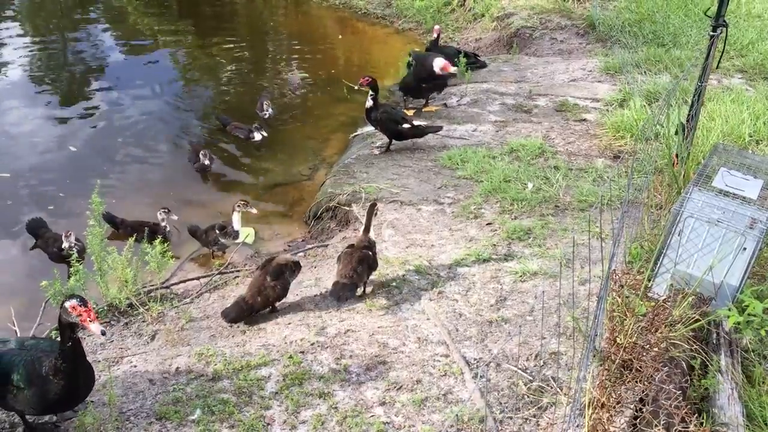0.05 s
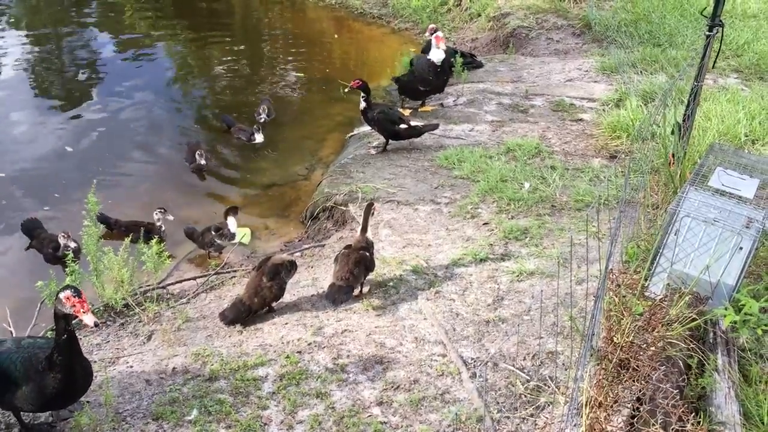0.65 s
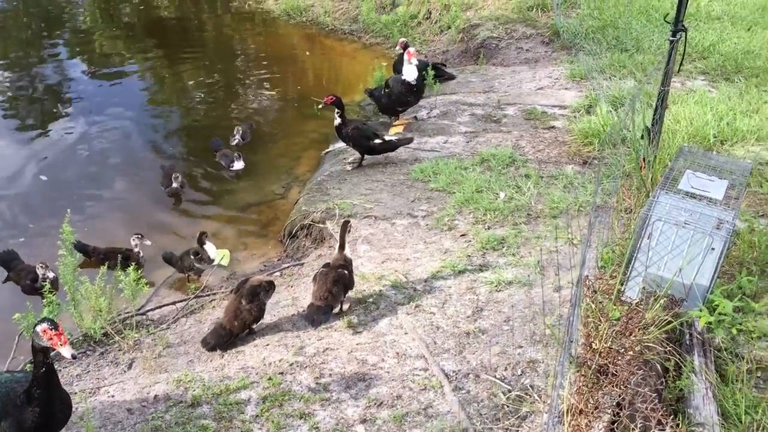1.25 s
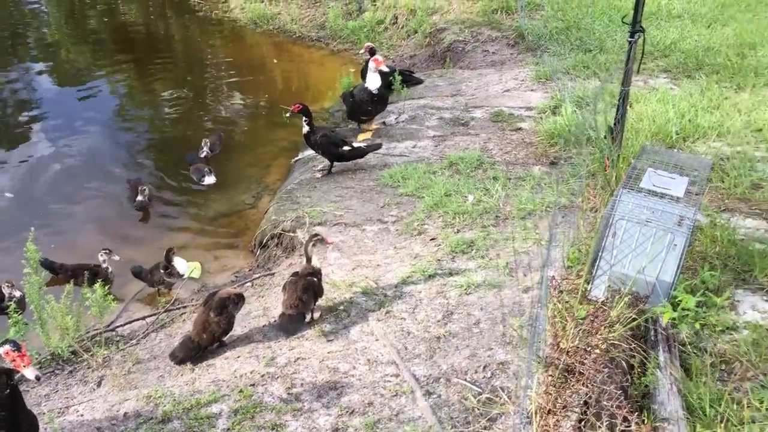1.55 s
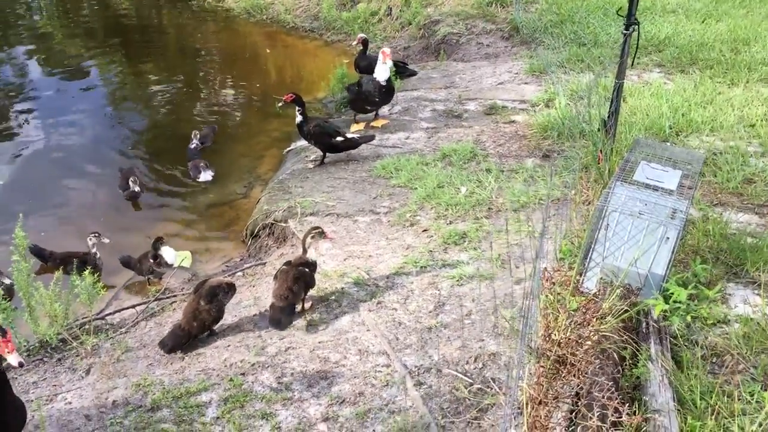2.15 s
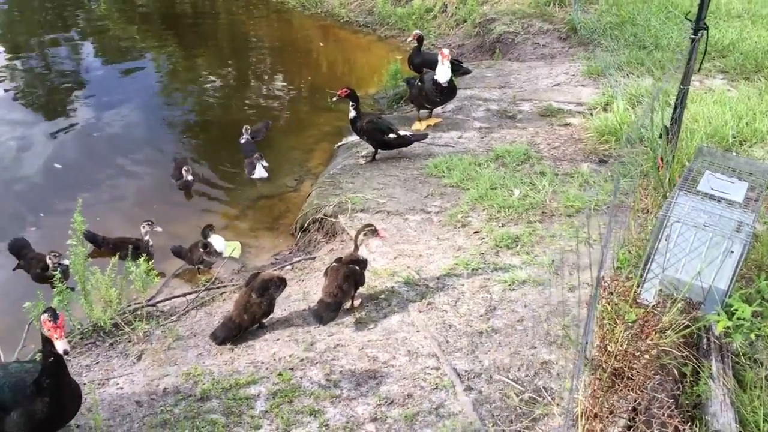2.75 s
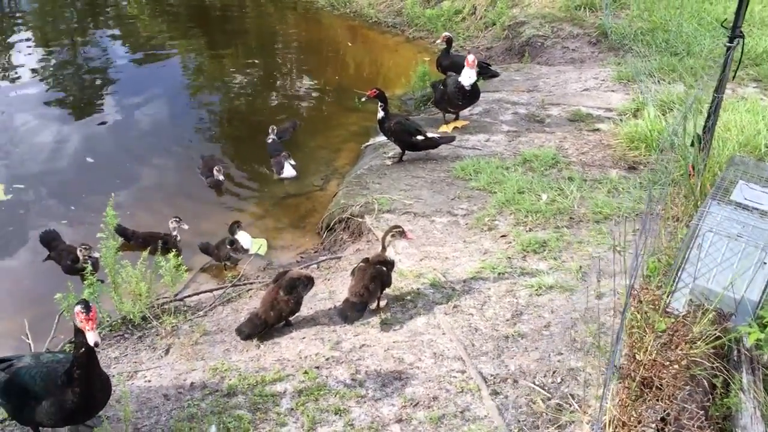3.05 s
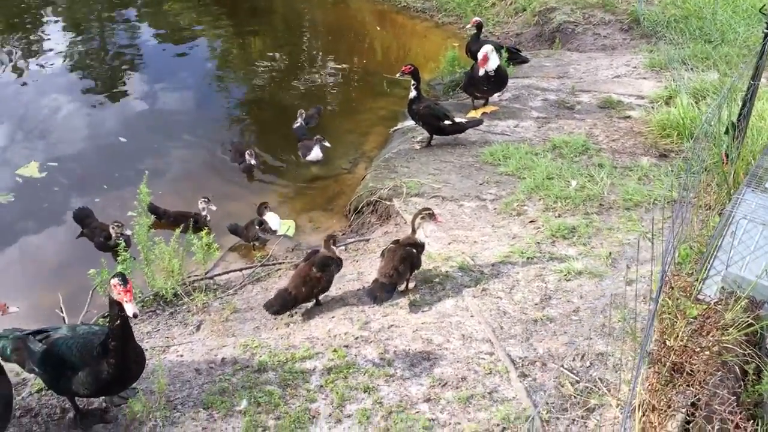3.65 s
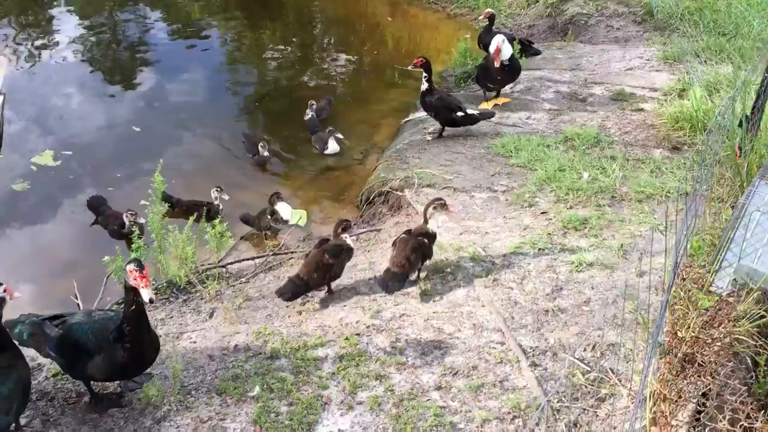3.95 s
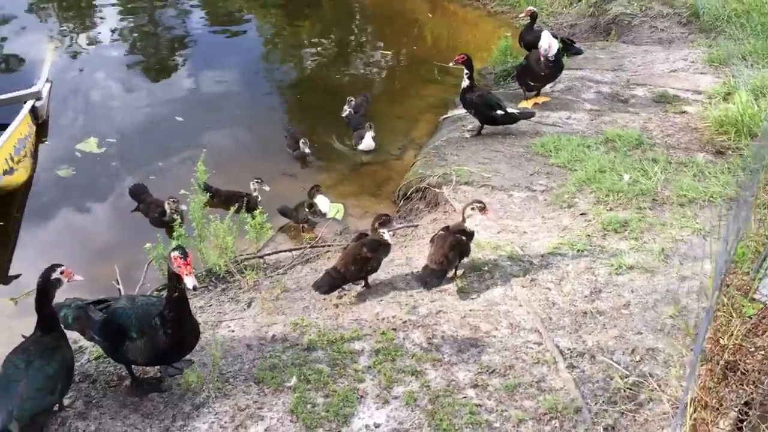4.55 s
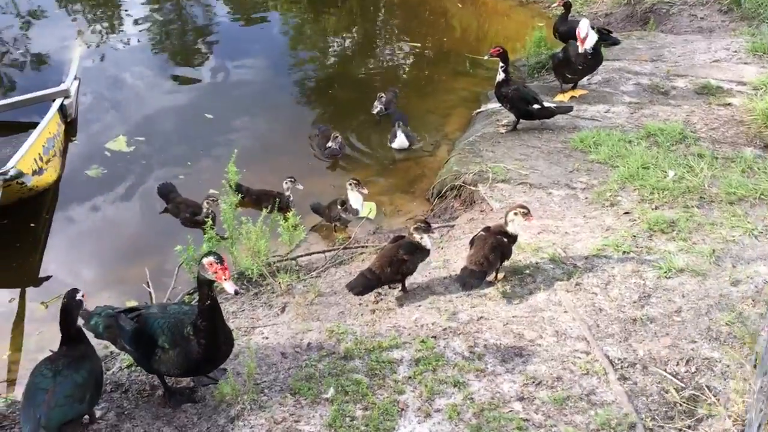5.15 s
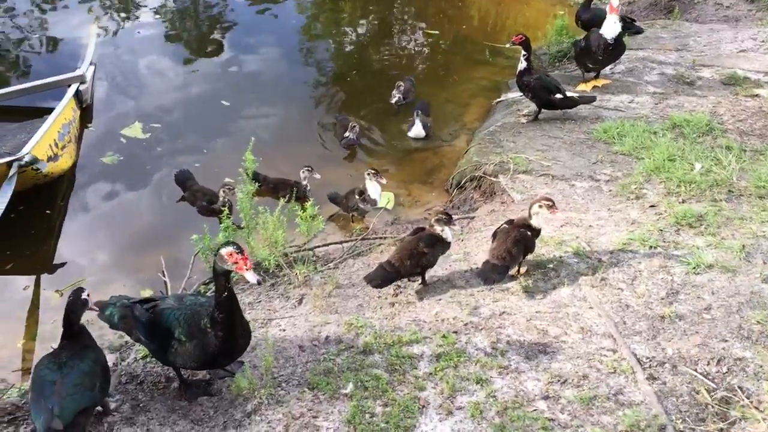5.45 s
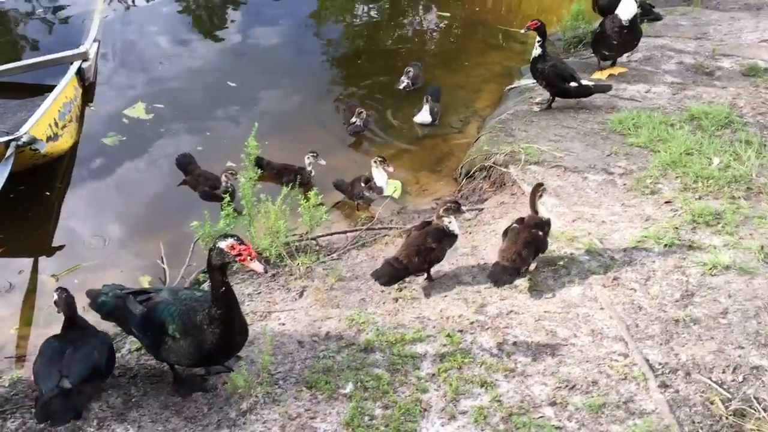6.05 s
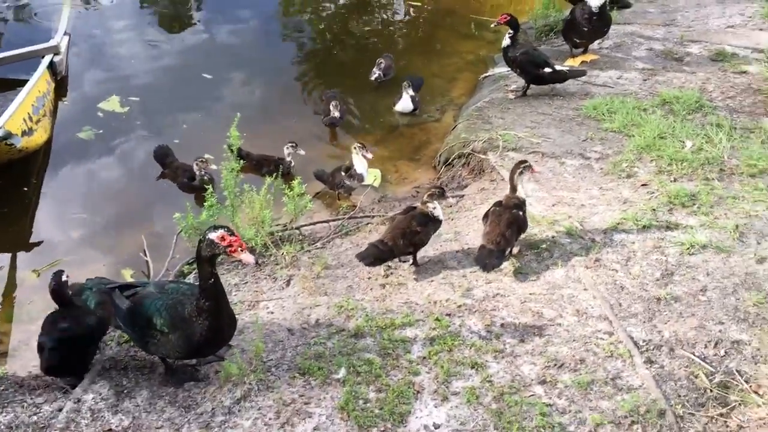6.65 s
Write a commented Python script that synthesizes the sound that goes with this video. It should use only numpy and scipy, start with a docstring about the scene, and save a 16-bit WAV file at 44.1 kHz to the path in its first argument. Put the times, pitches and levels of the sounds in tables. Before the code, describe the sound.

A steady low rumble of outdoor air and distant droning machinery fills the whole seven seconds beside a pond. Over it, ducklings give soft, short, high peeps in little runs: from 0.3 to 0.8 seconds, around 1.5 with a couple of lower squeaks, once at 2.4, and in a clearer pair near 2.9. Fainter peeps follow until 3.7, then more come around 5.3 and 5.9. Soft dull pats on sand and tiny dry twig ticks are scattered throughout, the clearest pat at 6 seconds. Light rustling comes at about 4.6 and 5.9, and more strongly at 6.6, together with a last run of peeps that climbs in pitch. A barely audible insect holds a thin high note for most of the time; another ticks faintly from 5 seconds and swells into a very high, soft buzz from 5.5 to the end.

```python
"""Ducklings at a pond's edge.

Ducklings peep in short runs: each peep is an arch of pitch, its harmonics shaped by throat and bill.
The flock adds lower pips, soft pats, dry ticks and, late on, rustling from sliding friction.
In the grass one insect holds a thin high note; a katydid ticks, then buzzes, with its wings.
Behind them are outdoor air and the drone of distant machinery."""
import sys
import numpy as np
from scipy import signal
from scipy.fft import rfft, irfft, next_fast_len
from scipy.io import wavfile

SR = 44100
rng = np.random.default_rng(int(sys.argv[2]) if len(sys.argv) > 2 else 0)


def transcribe(u):
    """Save the signal u as a 16-bit wav file named by the first command-line argument.

    u: samples, shape (n,) or (channels, n), limited to [-1, 1]; the rate is SR.
    q: integer samples, one column per channel.
    """
    v = np.clip(np.atleast_2d(u).T, -1, 1)
    q = np.round(v * 32767).astype(np.int16)
    wavfile.write(sys.argv[1], SR, q)


N = 299439
TIME_S = np.arange(N) / SR

# engine orders: pitch_hz, level_db, wander_hz
DRONE_ORDERS = [(50.7, -51.5, 0.23), (69.97, -49.5, .2), (81.9, -57.5, 0.32), (126.4, -60, 0.38),
                (182, -68, 1.5), (361.7, -74.5, 3.51)]
# swell of the low orders: time_s, gain_db
DRONE_SWELL = [(0, 0), (1.2, 2), (2.1, -1), (3.15, 2), (4.2, 0), (5.05, -3), (5.52, 3.3), (5.82, -7.5),
               (6.4, -0.7), (6.79, -5)]
# outdoor rumble and air: freq_hz, density_db
AIR_SPECTRUM = [(12, -37), (28, -13.5), (46, -1.5), (66, 1.5), (100, -4.5), (128, -7.5), (165, -14.5),
                (240, -20.5), (470, -27), (620, -27), (760, -30), (1000, -30.5), (1800, -37), (3000, -42.5),
                (8500, -48.5), (14000, -48)]
# breeze on the air's middle band: time_s, gain_db
BREEZE = [(0, 1.8), (.4, -1), (1.0, 0), (3.0, -0.6), (4.75, .5), (5.45, -1), (5.85, 0), (6.35, -0.5),
          (6.79, 2)]
# katydid wing spectrum: freq_hz, density_db
KATYDID_WING = [(7000, -31), (9000, -8.5), (10300, -7), (11600, 0), (12900, -7.5), (13800, -15),
                (16000, -25)]
# thin insect's trills: start_s, end_s, level_db
TRILLS = [(-.3, 2.15, -85.5), (2.2, 4.0, -83), (4.0, 6.3, -86)]
# rustle strokes: peak_s, rise_s, fall_s, level_db, bright_share
RUSTLES = [(4.6, .75, 0.27, -65, 0.92), (4.785, .11, 0.1, -63, 0.53), (5.87, .2, 0.25, -63.5, 0.73),
           (6.572, .085, .19, -55.5, .55), (6.68, .05, 0.03, -58.5, 0.15), (6.775, 0.11, .12, -66.5, .05)]
# dull friction spectrum: freq_hz, density_db
RUSTLE_DULL = [(200, 5), (600, 0), (1400, 9), (2300, 9.5), (4000, 6.5), (7500, -4.5), (16000, -34)]
# bright friction spectrum: freq_hz, density_db
RUSTLE_BRIGHT = [(300, 16), (2500, -7), (5000, 5), (9500, 6), (14500, 5.5), (16000, -7)]
# pats on sand: start_s, relative_peak_db, pitch_ratio
PATS = [(0.332, -41, 0.98), (1.611, -51, 0.91), (2.616, -43.5, 1.0), (3.751, -44, 0.86), (4.896, -41, 0.93),
        (5.847, -43.5, 0.79), (6.023, -36.5, 0.63), (6.44, -47.5, 0.64), (6.53, -43.5, 1.0),
        (6.68, -43, 1.0)]
# damped modes of a pat: freq_hz, gain_db, width_hz
PAT_MODES = [(248, 10, 150), (538, 17, 250), (880, 6, 380)]
# snaps of twigs and grit: start_s, relative_peak_db, tail_db, centre_hz
TWIG_TICKS = [(0.15, -47, -16, 4940), (0.220, -50.5, -16, 2800), (0.333, -57, -10, 9000),
              (1.191, -46, -16.5, 10500), (1.334, -61, -8, 6000), (1.762, -49.5, -22, 4970),
              (2.008, -47, -20, 4270), (2.6165, -51.5, -18, 5500), (2.7114, -58, -14, 5000),
              (4.519, -48.5, -10, 10500), (6.0236, -47, -22, 8000), (6.443, -57, -13, 4500)]
# lower pips and squeaks: top_s, length_s, top_hz, level_db, rise_share
PIPS = [(1.346, .024, 698, -63, .6), (1.373, .015, 1130, -57, 0.83), (2.9, 0.022, 1780, -64.5, 0.4),
        (4.49, 0.011, 2090, -66, 0.47), (4.986, 0.033, 1690, -69, 0.44), (5.06, 0.096, 1515, -72, .45),
        (5.13, .047, 1268, -57, .45), (5.359, .034, 1200, -67, 0.47), (6.13, .075, 1290, -69, 0.46)]
# throat and bill response for pips: freq_hz, gain_db
PIP_THROAT = [(600, 1), (950, 2), (1300, -9.5), (2000, -3), (4000, -1)]
# duckling peeps: top_s, length_s, start_hz, top_hz, level_db, rise_share
PEEPS = [(0.286, 0.042, 2350, 2750, -69.5, .32), (0.387, 0.063, 2330, 3520, -68, 0.26),
         (0.515, 0.053, 2440, 3290, -68.5, 0.15), (0.73, .044, 2250, 2600, -62.5, .6),
         (0.787, 0.041, 2180, 2490, -65, 0.63), (1.386, 0.034, 2390, 2850, -69.5, .6),
         (1.437, .056, 2520, 3270, -64.5, 0.72), (1.491, 0.045, 2420, 3250, -65.5, 0.72),
         (1.552, 0.039, 2350, 3410, -64, 0.6), (2.447, 0.05, 2220, 2674, -61.5, 0.59),
         (2.9, .034, 2200, 2600, -61.5, 0.54), (2.953, 0.047, 2240, 2690, -57, 0.66),
         (3.214, .07, 2030, 2560, -71, 0.62), (3.606, .045, 1940, 2340, -72, 0.34),
         (3.689, 0.073, 1980, 3000, -71.5, 0.6), (5.181, .04, 2360, 2820, -70, 0.64),
         (5.237, 0.054, 2440, 3100, -64.5, 0.67), (5.296, 0.056, 2445, 3320, -64, 0.72),
         (5.351, 0.033, 2340, 3000, -68, .62), (5.903, .036, 2335, 2630, -59.3, 0.57),
         (5.96, .034, 2250, 2630, -59.8, 0.54), (6.407, 0.035, 2050, 2320, -70, .57),
         (6.45, .039, 2010, 2560, -66.5, 0.58), (6.491, 0.037, 2110, 2600, -67, .55),
         (6.535, .036, 2190, 2500, -68, .48), (6.615, .05, 2790, 3700, -62.5, .58),
         (6.668, 0.057, 2655, 3840, -57, 0.6)]
# throat and bill response for peeps: freq_hz, gain_db
PEEP_THROAT = [(1900, 11), (2250, 6.5), (2550, 4.5), (2850, 1.5), (3200, -2), (3600, -15.5), (4500, 1),
               (5600, 5), (6500, -9), (7800, -16), (8900, 7.5), (10500, -21)]
# microphone treble response: freq_hz, gain_db
MICROPHONE = [(3000, 0.5), (3900, 2), (4500, 0.5), (4900, -2), (5400, .5), (6800, 0.5), (7700, -2.5),
              (8800, 0), (10400, -2), (13000, -0.5), (14400, -0.5), (15700, -2.5)]


def amp(db):
    """Decibels to gain."""
    return 10 ** (np.asarray(db) / 20)


def unit(x):
    """Scale to rms 1."""
    return x / np.sqrt(np.mean(x ** 2) + 1e-20)


def spectrum_db(table, hz):
    """Spectrum table interpolated over log frequency."""
    freq_hz, db = np.transpose(table)
    return np.interp(np.log(hz + 1), np.log(freq_hz + 1), db)


def curve(table):
    """Time table interpolated linearly."""
    return np.interp(TIME_S, *np.transpose(table))


def add(mix, start_s, sound):
    """Mix a sound in at start_s."""
    part = mix[max(round(start_s * SR), 0):][:len(sound)]
    part += sound[:len(part)]


def noise(spectrum, size=N):
    """Coloured noise, rms 1."""
    padded = next_fast_len(size)
    gain = amp(spectrum_db(spectrum, np.fft.rfftfreq(padded, 1 / SR)))
    return unit(irfft(rfft(rng.standard_normal(padded)) * gain, padded)[:size])


def drift(rate_hz, size=N):
    """Smooth random motion up to about rate_hz, rms 1."""
    padded = next_fast_len(size)
    gain = np.exp(-(np.fft.rfftfreq(padded, 1 / SR) / rate_hz) ** 2)
    return unit(irfft(rfft(rng.standard_normal(padded)) * gain, padded)[:size])


def machinery(upper_swell_db, swell_hz, split_hz):
    """Wavering engine orders carried louder and softer by the air: low ones together, upper singly."""
    out = np.zeros(N)
    for hz, db, wander_hz in DRONE_ORDERS:
        phase = 2 * np.pi * (np.cumsum(hz + wander_hz * drift(3.48)) / SR + rng.random())
        swell_db = curve(DRONE_SWELL) if hz < split_hz else upper_swell_db * drift(swell_hz)
        out += amp(db) * unit(np.sin(phase) * amp(swell_db))
    return out


def air(level_db, flutter_db):
    """Broad outdoor rumble; the middle band follows the breeze."""
    bed = amp(level_db) * noise(AIR_SPECTRUM)
    middle = signal.sosfiltfilt(signal.butter(2, [280, 2200], "band", fs=SR, output="sos"), bed)
    return bed + middle * (amp(curve(BREEZE) + flutter_db * drift(28)) - 1)


def thin_insect(pitch_hz, wander_hz, width_hz, ramp_s):
    """Far insect: a narrow noise band in long trills that fade in and out."""
    phase = 2 * np.pi * np.cumsum(pitch_hz + wander_hz * drift(0.87)) / SR
    song = drift(width_hz) * np.cos(phase) + drift(width_hz) * np.sin(phase)
    envelope = sum(amp(db) * np.clip(np.minimum(TIME_S - start_s, end_s - TIME_S) / ramp_s, 0, 1)
                   for start_s, end_s, db in TRILLS)
    return envelope * unit(song)


def katydid(first_s, gap_s, tick_s, count, tick_db, growth_db, buzz_s, attack_s, buzz_db, stroke_hz):
    """Wing strokes pulse one band of noise: single ticks growing louder, then a fast, swelling run."""
    strokes = unit((1 + np.cos(2 * np.pi * stroke_hz * TIME_S)) ** 0.53)
    envelope = amp(buzz_db) * strokes * np.clip((TIME_S - buzz_s) / attack_s, 0, 1)
    tick = np.hanning(round(tick_s * SR))
    for k in range(count):
        add(envelope, first_s + k * gap_s - tick_s / 2, amp(tick_db + k * growth_db) * tick)
    return envelope * noise(KATYDID_WING)


def rustle(range_db, grain_db, crackle_per_s, crackle_db):
    """Sliding friction: strokes of grainy hiss, dull to bright, with scattered tiny snaps."""
    power, bright_power = np.zeros(N) + 1e-20, np.zeros(N)
    for peak_s, rise_s, fall_s, db, bright_share in RUSTLES:
        from_peak = np.maximum((peak_s - TIME_S) / rise_s, (TIME_S - peak_s) / fall_s)
        stroke_power = amp(db - range_db * from_peak) ** 2
        power += stroke_power
        bright_power += bright_share * stroke_power
    bright = np.clip(bright_power / power, 0, 1)
    hiss = np.sqrt(1 - bright) * noise(RUSTLE_DULL) + np.sqrt(bright) * noise(RUSTLE_BRIGHT)
    snaps = rng.standard_normal(N) * (rng.random(N) < crackle_per_s / SR)
    crackle = signal.fftconvolve(snaps, noise(RUSTLE_BRIGHT, size=32) * np.hanning(32), "same")
    grainy_hiss = unit(hiss * amp(grain_db * drift(200)))
    return np.sqrt(power) * unit(grainy_hiss + amp(crackle_db) * unit(crackle))


def sand_pats(gain_db, push_s, grit_db, grit_t60_s):
    """A brief push and shifting grit excite a dull, heavily damped ring."""
    out, t = np.zeros(N), np.arange(SR // 8) / SR
    for start_s, db, pitch_ratio in PATS:
        push = t / push_s * np.exp(-t / push_s)
        grit = amp(grit_db - 60 * t / grit_t60_s) * rng.standard_normal(len(t))
        ring = np.zeros(len(t))
        for hz, mode_db, width_hz in PAT_MODES:
            decay = amp(mode_db) * width_hz * np.exp(-np.pi * width_hz * t)
            ring += decay * np.cos(2 * np.pi * hz * pitch_ratio * t)
        pat = signal.fftconvolve(push + grit, ring)[:len(t)]
        add(out, start_s + 0.0008, amp(db + gain_db) * pat / abs(pat).max())
    return out


def twig_ticks(gain_db, tail_t60_s, skirt_db):
    """A sharp snap and a brief crumbling tail through one broad resonance."""
    out, t = np.zeros(N), np.arange(2048) / SR
    hz = np.fft.rfftfreq(len(t), 1 / SR)
    for start_s, db, tail_db, centre_hz in TWIG_TICKS:
        force = amp(tail_db - 60 * t / tail_t60_s) * rng.standard_normal(len(t))
        force[0] = 1
        offset_oct = np.log2((hz + 1) / centre_hz)
        resonance = amp(skirt_db * np.log2(1 + offset_oct ** 2))
        snap = irfft(rfft(np.roll(force, SR // 1000)) * resonance)
        add(out, start_s, amp(db + gain_db) * snap / abs(snap).max())
    return out


def bank_scatter(x, wet_db, t60_s):
    """Ground, water and plants scatter back a short, faint tail."""
    t = np.arange(SR // 2) / SR
    echoes = rng.standard_normal(len(t)) * (rng.random(len(t)) < 2000 / SR)
    tail = echoes * (t > .004) * amp(-60 * t / t60_s)
    return x + amp(wet_db) * signal.fftconvolve(x, tail / np.linalg.norm(tail))[:N]


def call(length_s, rise_share, pitches_hz, throat, overtone_db_per_oct, jitter, shimmer,
         rise_power, fall_power, fade_share, lead_s, stress_db):
    """One arch of pitch; three harmonics sweep across the throat's resonances."""
    start_hz, top_hz, end_hz = pitches_hz
    t = np.arange(-lead_s, length_s, 1 / SR)
    top_s = length_s * np.clip(rise_share, .05, .95)
    up = np.clip(t / top_s, 0, 1)
    down = np.clip((t - top_s) / (length_s - top_s), 0, 1)
    hz = start_hz + (top_hz - start_hz) * np.sin(np.pi / 2 * up ** rise_power) ** 2
    hz += (end_hz - top_hz) * np.sin(np.pi / 2 * down ** fall_power) ** 2
    hz *= 1 + jitter * drift(360, size=len(t))
    phase = 2 * np.pi * np.cumsum(hz) / SR
    tone = sum(amp(spectrum_db(throat, k * hz) + overtone_db_per_oct * np.log2(k)) * np.sin(k * phase)
               for k in range(1, 4))
    ramp_s = np.clip(fade_share, .1, 1) * length_s / 2
    envelope = np.interp(t, [t[0], ramp_s, length_s - ramp_s, length_s], [0, 1, 1, 0]) ** 1.17
    envelope *= amp(stress_db * np.tanh((t - top_s) / 0.015) / 2)  # positive stress favours the fall
    return unit(tone * envelope * (1 + shimmer * drift(160, size=len(t))))


def pips(lead_s):
    """Lower calls, hoarse from strong jitter and shimmer."""
    out = np.zeros(N)
    for top_s, length_s, top_hz, db, rise_share in PIPS:
        pip = call(length_s, rise_share, (.63 * top_hz, top_hz, .8 * top_hz), PIP_THROAT,
                   overtone_db_per_oct=-26, jitter=0.062, shimmer=0.44,
                   rise_power=0.905, fall_power=1.1, fade_share=0.48, lead_s=lead_s, stress_db=1)
        add(out, top_s - rise_share * length_s - lead_s, amp(db) * pip)
    return out


def peeps(lead_s, easy_start_hz, easy_top_hz, easy_end_hz):
    """Ducklings: the harder the peep, the later it climbs, the longer it holds, the brighter it is."""
    out = np.zeros(N)
    for top_s, length_s, start_hz, top_hz, db, rise_share in PEEPS:
        effort_oct = np.log2(top_hz / easy_top_hz)
        end_hz = easy_end_hz * (start_hz / easy_start_hz) ** 0.56
        peep = call(length_s, rise_share, (start_hz, top_hz, end_hz), PEEP_THROAT,
                    overtone_db_per_oct=min(-22.5 + 90 * effort_oct, -11.5), jitter=0.013, shimmer=.17,
                    rise_power=1.2 + 0.683 * effort_oct, fall_power=.85 + 0.467 * effort_oct,
                    fade_share=0.48 - 0.24 * effort_oct, lead_s=lead_s,
                    stress_db=16 * (0.72 - rise_share))
        add(out, top_s - rise_share * length_s - lead_s, amp(db) * peep)
    return out


def scene():
    """The flock on the bank over insects, air and the far drone; mono."""
    voices = peeps(lead_s=.007, easy_start_hz=2270, easy_top_hz=2640, easy_end_hz=2146)
    voices += pips(lead_s=0.0029)
    knocks = sand_pats(gain_db=0.5, push_s=0.00027, grit_db=-12.5, grit_t60_s=0.034)
    knocks += twig_ticks(gain_db=4.5, tail_t60_s=0.02, skirt_db=-7)
    flock = bank_scatter(voices + knocks, wet_db=-13.5, t60_s=0.12)
    insects = katydid(first_s=5.064, gap_s=.0638, tick_s=0.018, count=7, tick_db=-70.5, growth_db=.85,
                      buzz_s=5.44, attack_s=0.65, buzz_db=-70.5, stroke_hz=50.7)
    insects += thin_insect(pitch_hz=10810, wander_hz=22, width_hz=130, ramp_s=.25)
    rustling = rustle(range_db=16.5, grain_db=2.5, crackle_per_s=140, crackle_db=-15.5)
    breeze = air(level_db=-47.5, flutter_db=1.0)
    drone = machinery(upper_swell_db=2.5, swell_hz=4, split_hz=110)
    return (flock + insects + rustling + breeze + drone)[None]


def record(dry):
    """Microphone colour, then a steep low-pass at 15.8 kHz."""
    response = amp(spectrum_db(MICROPHONE, np.fft.rfftfreq(N, 1 / SR)))
    coloured = irfft(rfft(dry) * response, N)
    lowpass = signal.firwin(1023, 15800, window=("kaiser", 8), fs=SR)
    return signal.oaconvolve(coloured, lowpass[None], "same")


dry = scene()
out = record(dry)
transcribe(out)
```